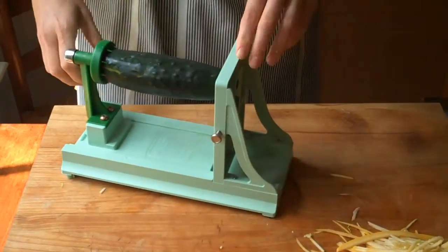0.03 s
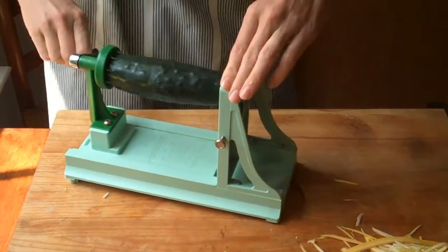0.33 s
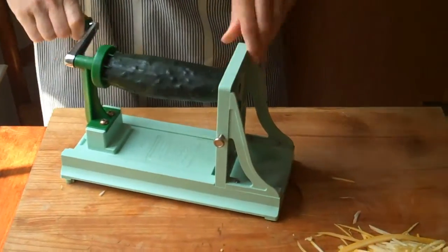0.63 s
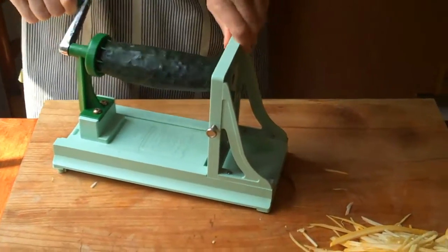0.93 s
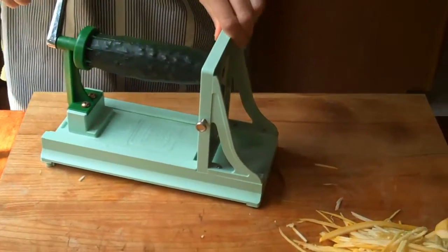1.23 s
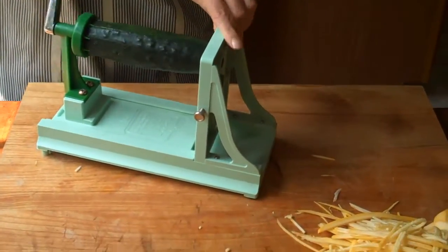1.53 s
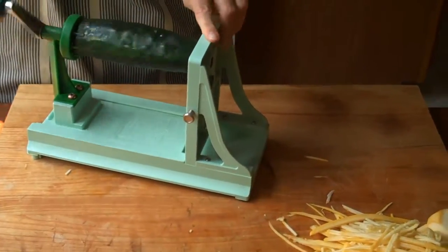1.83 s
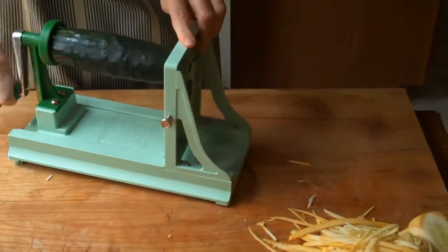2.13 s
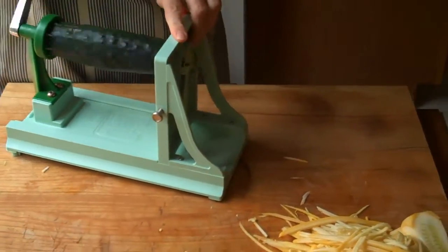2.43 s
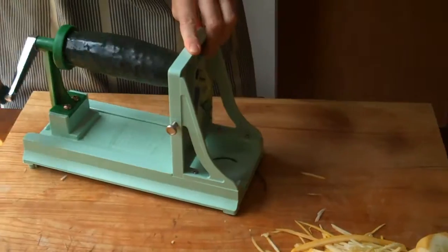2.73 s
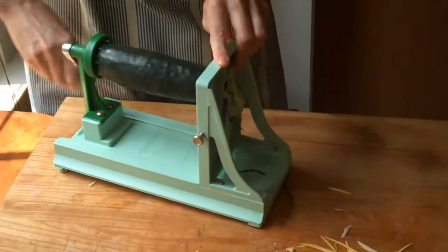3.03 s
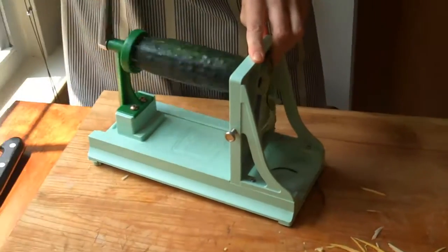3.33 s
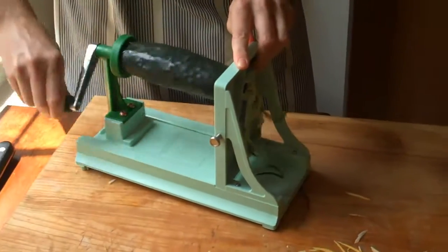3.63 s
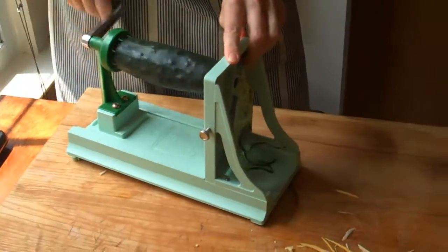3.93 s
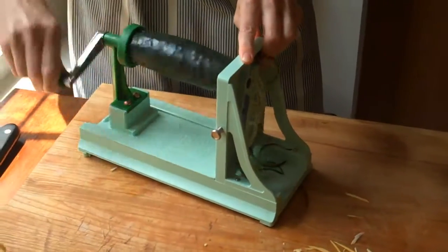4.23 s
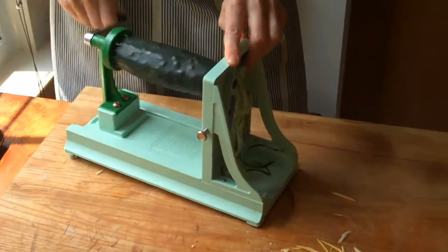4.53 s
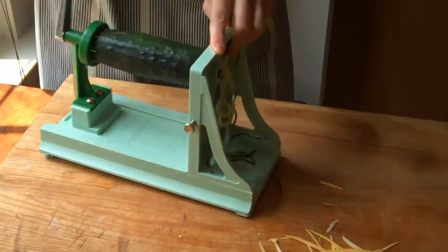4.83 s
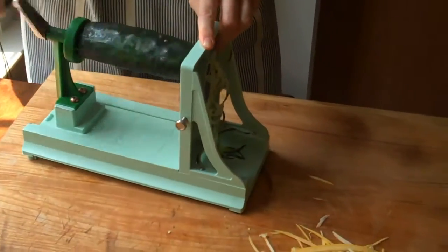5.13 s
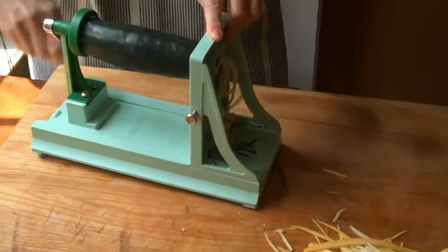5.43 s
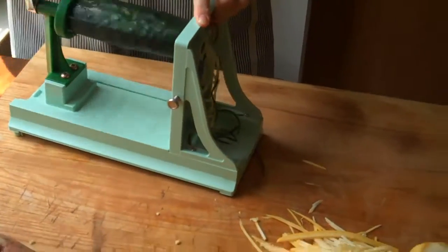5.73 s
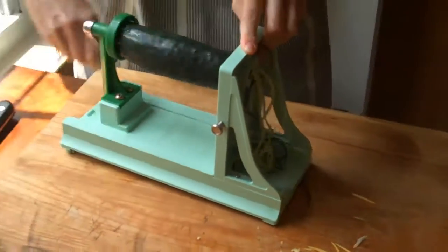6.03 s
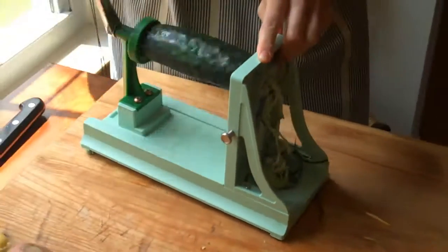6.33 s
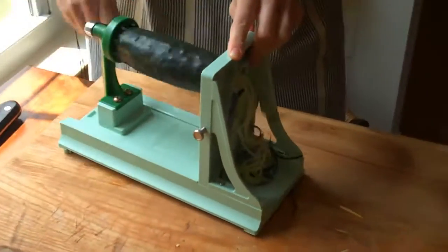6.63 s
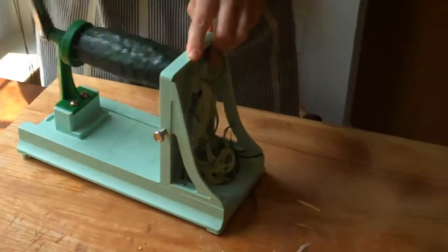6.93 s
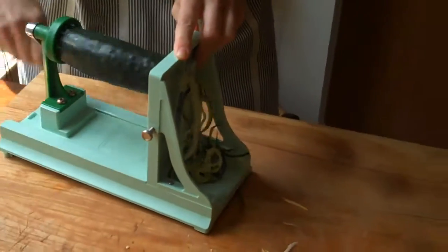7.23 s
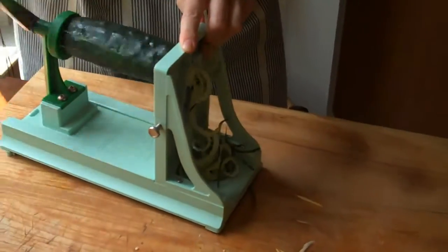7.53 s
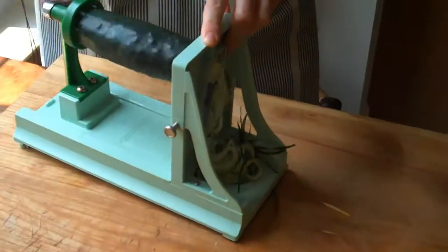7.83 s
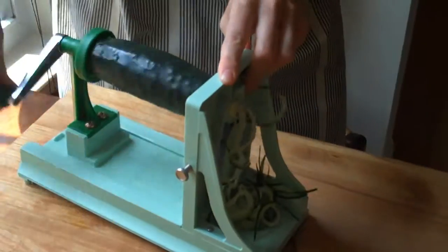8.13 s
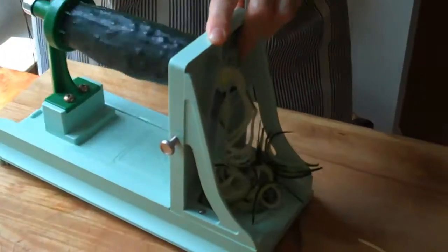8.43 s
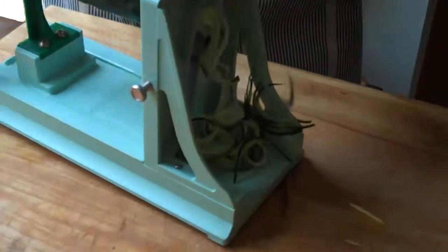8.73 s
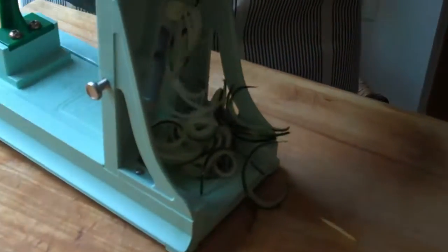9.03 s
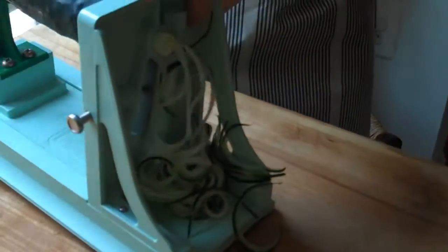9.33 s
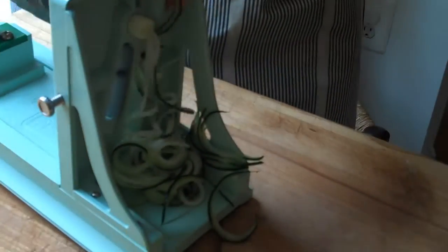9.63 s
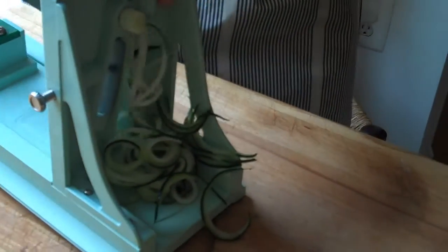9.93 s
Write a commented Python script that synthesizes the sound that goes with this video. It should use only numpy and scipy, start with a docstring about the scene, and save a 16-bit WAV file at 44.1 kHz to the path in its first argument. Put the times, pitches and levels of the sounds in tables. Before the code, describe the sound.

Close by in a small kitchen, a few plastic knocks and clicks come from a hand-cranked slicer starting up on a wooden board. After a short pause the cranking becomes continuous: sharp, irregular clacks and rattles over a quieter rasping scrape and the wet fizz of a cucumber being shredded. The cucumber creaks faintly twice, the base bumps the board now and then, and the rattling gets busier toward the end.

```python
"""A hand-cranked spiral slicer cuts a cucumber on a wooden board in a small kitchen.
The base thuds softly on the board and the crank makes two brief turns. From 1.6 s it keeps going:
the loose crank and carriage clack against the plastic frame while the blade scrapes and shreds the
wet flesh. The cucumber creaks at 2.4 and 3.3 s, the base thuds a few more times, and the clacks
crowd together through the second half. The room answers the knocks with a short tail."""
import sys
import numpy as np
from scipy import signal
from scipy.fft import rfft, irfft, next_fast_len
from scipy.io import wavfile
from scipy.ndimage import uniform_filter1d, map_coordinates

SR = 44100
rng = np.random.default_rng(int(sys.argv[2]) if len(sys.argv) > 2 else 0)


def store_pcm(level_fs):
    """Save levels as 16-bit WAV."""
    pcm = np.round(np.clip(level_fs, -1, 1) * 32767).astype(np.int16)
    wavfile.write(sys.argv[1], SR, np.atleast_2d(pcm).T)


N = 441000
TOP_HZ = 13950  # top edge of the sound
HARD_DB = -12.2  # clacks above this level graze before they land and shove the board

# Colour of the kitchen's air. Each row: frequency in Hz, level in dB.
AIR_COLOUR = [(12, -50), (20, -10), (65, -28), (85, -18.5), (170, -19), (229, -13.5), (249, -15),
              (356, -6.5), (386, -12.5), (903, -12), (1040, -13), (14000, -39)]
# The kitchen's reverb. Each row: frequency in Hz, time to fall 60 dB in seconds.
ROOM_DECAY = [(150, 0.29), (1000, .42), (2500, 0.33), (12000, 0.36)]
# When the crank turns. Each row: start in seconds, length in seconds.
CRANK_TURNS = [(0.302, .4), (0.825, 0.33), (1.558, 8.5)]
# Colour of the rubbing hiss. Each row: frequency in Hz, level in dB.
RUB_COLOUR = [(4000, -39), (5900, -3.5), (6600, -12), (7200, -2.5), (7800, -1), (8600, -8), (13000, -13.5)]
# How the blade bites. Each row: time in seconds, wet shredding in dB, drag relative to it in dB.
BITE = [(1.3, -69, -8), (1.74, -63, 3.5), (2.42, -49, -5), (2.53, -51, 9), (2.78, -59, 7.5),
        (3.03, -57.5, -9), (3.17, -50, 0.5), (3.6, -55, 2.5), (4.01, -48.5, 2.5), (4.66, -51.5, 2),
        (4.95, -68, 9), (5.21, -57, -4), (5.4, -49.5, -18), (5.62, -50.5, 5), (6.55, -49, -5),
        (6.95, -54, 8), (8.6, -52.5, 4), (8.94, -50, -10), (9.44, -50, 0.5), (10, -54.5, -0.5)]
# Colour of the dragging scrape. Each row: frequency in Hz, level in dB.
SCRAPE_COLOUR = [(80, -23), (200, -16), (400, -11.5), (680, 5), (1000, -11.5), (1500, -3), (2700, -1),
                 (4000, -18), (9000, -59)]
# Colour of the wet shredding. Each row: frequency in Hz, level in dB.
SHRED_COLOUR = [(800, -44), (2500, 3), (4200, 2), (5500, 4.5), (6800, -3), (9500, -3.5), (12800, -6),
                (14000, -5)]
# Where the blade plate sings. Each row: centre in Hz, width in Hz, lift in dB.
BLADE_RESONANCES = [(2710, 64, 9.5), (3570, 130, 5), (5000, 150, 4), (6630, 550, 7), (8750, 86, 0),
                    (9150, 650, 0), (12500, 360, 5)]
# The cucumber's creaks. Each row: start in seconds, length in seconds, level in dB, pitch in Hz.
CUCUMBER_CREAKS = [(2.432, 0.044, -40, 970), (3.251, 0.075, -47, 884)]
# The board's modes. Each row: frequency in Hz, level in dB, time to fall 60 dB in seconds.
BOARD_MODES = [(98, -25, 0.062), (141, -4, 0.15), (178, -18, 0.094), (226, -14, 0.08), (276, -6, 0.055),
               (337, 3.5, 0.11), (372, -7, 0.09), (540, -8, 0.06)]
# The base rocking on the board. Each row: start in seconds, level in dB, lift of the upper modes in dB.
BASE_THUDS = [(0.087, -35, -13), (0.19, -49.5, 13), (0.600, -50, 9), (3.259, -36, 1), (3.305, -40.5, 8),
              (4.663, -41.5, -4)]
# The plastic frame's overall colour. Each row: frequency in Hz, level in dB.
FRAME_COLOUR = [(40, -67.5), (200, -30), (290, -29), (450, -13.5), (650, -0.5), (1120, -3.5), (1450, -4.5),
                (2000, -6.5), (2900, -5), (4000, -11.5), (5800, -12), (9000, -20), (14000, -23.5)]
# The frame's strongest resonances. Each row: centre in Hz, width in Hz, lift in dB.
FRAME_RESONANCES = [(137.5, 13, 21), (211, 27, 7), (315, 13, 6.5), (433, 33, 9.5), (627, 56, 2.5),
                    (700, 11, 8), (735, 23, 5), (973, 15, 13), (1102, 45, 9), (1271, 92, 6), (1524, 23, 2),
                    (1896, 500, 5), (2256, 66, 4), (2750, 220, 2), (3165, 47, 4), (3480, 140, 4)]
# The frame's ring away from its resonances. Each row: frequency in Hz, time to fall 60 dB in seconds.
FRAME_DECAY = [(60, 0.13), (350, 0.21), (700, 0.094), (1100, 0.12), (2000, 0.035), (4500, 0.035),
               (12000, 0.016)]
# The louder clacks of crank and carriage. Each row: start in seconds, level in dB, then three tone
# controls in dB: hollow knock, ring of the upright, sharp snap.
CRANK_CLACKS = [(0.077, -34.5, -9, -13.5, -24), (0.278, -44, -21, -23, -25), (0.348, -35, -13, -18, -45),
                (0.467, -36.5, -6, -13, -21), (0.487, -34.5, -22, -21, -20), (0.518, -27.5, -24, -19, -19),
                (0.598, -29.5, -20, -12, -38), (0.662, -13, -25.5, -20, -32), (0.671, -19.5, -31, -5, -17),
                (0.687, -18.5, -22, -16, -19), (1.115, -42, 1, -9, -25), (1.371, -39, -5, -12, -16),
                (1.648, -20.5, -21, -17.5, -40), (1.737, -22.5, -22, -15, -18), (1.841, -40, -14, -12, -26),
                (1.921, -28.5, -10.5, -14, -26), (2.12, -25, -12.5, -14, -27), (2.211, -21.5, -7, -10, -25),
                (2.274, -23.5, -8.5, -6, -15), (2.506, -28.5, -21, -12, -24), (2.547, -21.5, -29, -15, -16),
                (2.585, -11, -20, -8.5, -11.5), (2.983, -22.5, -24, -19, -23),
                (3.054, -18, -25.5, -17, -26), (3.073, -22, -7, -7.5, -13), (3.313, -14, -23, -14, -7),
                (3.413, -12.5, -20, -19, -6.5), (3.456, -25, -12, -13, -14), (3.503, -26, -10, -16, -7),
                (3.529, -10.5, -16.5, -11, -14.5), (3.74, -23, -8.5, -12, -14),
                (3.85, -15.5, -17, -13.5, -27), (4.032, -18.5, -18.5, -15, -23),
                (4.143, -14, -22, -18, -10.5), (4.185, -11, -24, -12, -21.5),
                (4.313, -18.5, -13, -17, -6.5), (4.416, -20.5, -14.5, -11, -33),
                (4.474, -20.5, -23, -17, -31), (4.489, -19.5, -15, -9, -19), (4.601, -27, -32, -29, -2),
                (4.675, -21, -13.5, -11.5, -21), (4.824, -14.5, -18.5, -11.5, -17),
                (5.221, -12.5, -18.5, -12.5, -14), (5.335, -20, -23.5, -21.5, -36),
                (5.419, -13, -16.5, -18.5, -17.5), (5.47, -17, -19, -16, -24),
                (5.661, -18, -14.5, -13.5, -14.5), (5.761, -13, -25.5, -22, -12.5),
                (5.863, -13, -13, -7, -8.5), (6.055, -20, -5.5, -7.5, -26), (6.092, -13, -24, -10, -20.5),
                (6.166, -14, -27, -22, -25), (6.254, -20, -27, -20.5, -33), (6.293, -19.5, -23, -18, -29),
                (6.334, -20.5, -30, -21, -42), (6.361, -16, -25, -15, -12), (6.425, -10, -18, -11, -13.5),
                (6.531, -15.5, -27.5, -24, -25), (6.546, -12.5, -27, -23.5, -14),
                (6.568, -11.5, -26.5, -20, -22), (6.621, -10.5, -19.5, -17.5, -16),
                (6.652, -9.5, -30, -16.5, -21), (6.799, -13.5, -22, -17.5, -31),
                (6.913, -9.5, -18, -12, -12.5), (7.047, -30, -22.5, -13, -16.5), (7.104, -25, -4, -3, -10),
                (7.248, -20, -9, -9, -22), (7.268, -20, -19, -14, -23), (7.284, -13.5, -26, -13.5, -25),
                (7.505, -10, -29, -14.5, -12), (7.586, -22, -27.5, -24, -23), (7.661, -29.5, -3, -4, -17),
                (7.787, -10.5, -16, -13.5, -10.5), (7.827, -15, -27.5, -12.5, -25),
                (8.008, -18, -25, -16.5, -16), (8.047, -22, -22.5, -13.5, -26),
                (8.064, -17, -24, -27, -11.5), (8.139, -11.5, -22.5, -19.5, -18.5),
                (8.297, -12, -23, -13.5, -11.5), (8.335, -15.5, -19.5, -12.5, -26),
                (8.494, -16.5, -22.5, -13.5, -22), (8.591, -18, -21, -14.5, -9),
                (8.646, -14.5, -24, -13.5, -15), (8.761, -23.5, -19, -15, -22),
                (8.79, -16, -16.5, -19, -13.5), (8.853, -19.5, -11, -9.5, -14), (8.892, -11, -25, -14, -15),
                (9.045, -17, -14, -10, -27), (9.118, -28, -20, -22, -26), (9.139, -16, -18, -18.5, -7.5),
                (9.249, -14.5, -6.5, -12, -11), (9.354, -26.5, -12, -12, -25), (9.414, -18, -21, -14, -20),
                (9.462, -11.5, -22.5, -16.5, -20), (9.633, -20, -18.5, -17, -16.5),
                (9.737, -13, -21, -17, -16.5), (9.874, -26.5, -10, -14, -8)]


def amp(db):
    """Decibels to gain."""
    return 10 ** (np.asarray(db) / 20)


def unit(x):
    """Scale to rms 1."""
    return x / np.sqrt(np.mean(x ** 2) + 1e-20)


def along(points, hz):
    """Read (Hz, value) points on a log frequency axis."""
    freqs, values = np.transpose(points)
    return np.interp(np.log(hz + 1), np.log(freqs + 1), values)


def lift(resonances, hz):
    """The dB that a body's resonances add at each frequency."""
    return sum(db / (1 + (2 * (hz - centre) / width) ** 2) for centre, width, db in resonances)


def curves(rows):
    """An envelope for each column after the time."""
    times, *columns = np.transpose(rows)
    return [np.interp(np.arange(N) / SR, times, column) for column in columns]


def wobble(rate):
    """A random drift through rate points a second."""
    points = rng.standard_normal(int(N * rate / SR) + 4)
    return map_coordinates(points, [np.arange(N) * rate / SR], order=1)


def filtered(x, response):
    """Equalise x with a gain given as a function of frequency."""
    size = next_fast_len(N + SR // 2)
    return irfft(rfft(x, size) * response(np.fft.rfftfreq(size, 1 / SR)), size)[:N]


def coloured(x, colour, resonances=()):
    """Give x a colour and a body's resonances, at rms 1."""
    return unit(filtered(x, lambda hz: amp(along(colour, hz) + lift(resonances, hz))))


def grains(per_second, spread_db):
    """Random tiny impulses of uneven size, rms 1."""
    hit = rng.random(N) < per_second / SR
    return unit(hit * rng.standard_normal(N) * amp(spread_db * rng.standard_normal(N)))


def add(track, start, sound):
    """Mix a sound into the track at start seconds."""
    part = track[max(round(start * SR), 0):][:len(sound)]
    part += sound[:len(part)]


def turning(spin_up_s=0.05, spin_down_s=0.07):
    """A gate: 0 while the crank rests, 1 while it turns."""
    t = np.arange(N) / SR
    return sum(np.clip(np.minimum((t - start) / spin_up_s, 1 - (t - start - length) / spin_down_s), 0, 1)
               for start, length in CRANK_TURNS)


def kitchen_air(level_db):
    """A steady bed of room tone."""
    return amp(level_db) * coloured(rng.standard_normal(N), AIR_COLOUR)


def kitchen_reverb(x, swell_s, treble_db, count=40):
    """The walls' answer swells quickly; each stretch gets its own tail, as when hands move nearby."""
    hz, t, spectra = signal.stft(rng.standard_normal((count, SR // 2)), SR, nperseg=256)
    colour_db = along([(3000, 0.008), (8000, treble_db)], hz)[:, None]
    decay_db = 60 * t / along(ROOM_DECAY, hz)[:, None]
    tails = signal.istft(spectra * amp(colour_db - decay_db), SR, nperseg=256)[1]
    tails *= 1 - np.exp(-np.arange(tails.shape[1]) / SR / swell_s)
    out = np.zeros(N)
    for k, (part, tail) in enumerate(zip(np.array_split(x, count), tails)):
        add(out, k * N / count / SR, signal.fftconvolve(part, tail / np.linalg.norm(tail)))
    return out


def rubbing(level_db, flutter_db, full_cut_db=-51.5, follow=0.52):
    """A thin, fluttering rub while the crank turns, rising as the blade sinks into the flesh."""
    wet_db = curves(BITE)[0]
    rub_db = level_db + follow * (wet_db - full_cut_db) + flutter_db * wobble(110)
    return turning() * amp(rub_db) * coloured(rng.standard_normal(N), RUB_COLOUR)


def skin_crackle(level_db):
    """Firmer bits of skin snap on the blade."""
    wet_db = curves(BITE)[0]
    snaps = grains(per_second=40, spread_db=4.5)
    t = np.arange(SR // 100) / SR
    burst = rng.standard_normal(len(t)) * amp(-60 * t / 0.025)
    crackle = signal.fftconvolve(snaps, burst)[:N]
    return amp(wet_db + level_db) * coloured(crackle, SHRED_COLOUR, BLADE_RESONANCES)


def cutting(scrape_db, shred_db, ripple_db):
    """The cucumber judders over the blade and shakes the frame; its bursting cells fizz."""
    wet_db, drag_db = curves(BITE)
    slips = grains(per_second=2000, spread_db=1.5) * amp(2.15 * wobble(30))
    scrape = coloured(slips, SCRAPE_COLOUR, FRAME_RESONANCES)
    cells = grains(per_second=12000, spread_db=2.0) * amp(2.2 * wobble(40) + 1.62 * wobble(6.9))
    # many weak, narrow modes of the blade plate ripple the fizz
    fine_hz = np.linspace(0, TOP_HZ, 300)
    fine_db = ripple_db * rng.standard_normal(len(fine_hz))

    def plate(hz):
        return amp(along(SHRED_COLOUR, hz) + lift(BLADE_RESONANCES, hz) + np.interp(hz, fine_hz, fine_db))

    shred = unit(filtered(cells, plate))
    return amp(wet_db) * (amp(drag_db + scrape_db) * scrape + amp(shred_db) * shred)


def creaks(slips_per_s):
    """The cucumber drags: a short run of uneven slips rings a narrow resonance and its octave."""
    out = np.zeros(N)
    for start, length, db, hz in CUCUMBER_CREAKS:
        t = np.arange(round(length * SR)) / SR
        travel = np.cumsum(rng.exponential(slips_per_s / SR, len(t)))
        slips = np.diff(np.floor(travel), prepend=0)
        ring = (np.sin(2 * np.pi * hz * t) + 0.17 * np.sin(4 * np.pi * hz * t)) * amp(-60 * t / 0.043)
        creak = signal.fftconvolve(slips * rng.standard_normal(len(t)), ring)[:len(t)]
        add(out, start, amp(db) * unit(creak) * np.sin(np.pi * t / length))
    return out


def thuds(level_db, upper_db, shudder_s, band_hz):
    """The base settles on the board in a short shudder that rings the board's low modes."""
    t, out = np.arange(SR // 3) / SR, np.zeros(N)
    band = signal.butter(2, band_hz, "bandpass", fs=SR)
    for start, db, knock in BASE_THUDS:
        ring = sum(amp(level + (knock + upper_db) * (hz > 280) - 60 * t / t60) * np.cos(2 * np.pi * hz * t)
                   for hz, level, t60 in BOARD_MODES)
        # soft feet: the contact swells before it dies away
        force = rng.standard_normal(len(t)) * t / shudder_s * np.exp(-t / shudder_s)
        thud = signal.lfilter(*band, signal.fftconvolve(force, ring))
        add(out, start, amp(db + level_db) * thud / np.abs(thud).max())
    return out


def shoves(level_db, rise_s):
    """The hardest clacks give the board one short, low push; the sharper the blow, the stronger."""
    age, out = np.arange(SR // 20) / SR / rise_s, np.zeros(N)
    for start, db, _, _, snap in CRANK_CLACKS:
        if db > HARD_DB:
            add(out, start, amp(level_db + db + snap) * age * np.exp(-age))
    return out


def ticks(count, over_shred_db=18.5, knock_db=-17.5, ring_db=-15, snap_db=-31, scatter_db=1.5):
    """Light clack rows: play in the crank ticks at random, more often and harder as the blade bites."""
    wet_db = curves(BITE)[0]
    work = np.cumsum(turning() * amp(wet_db / 2))
    at = np.searchsorted(work, work[-1] * (np.arange(count) + rng.random(count)) / count)
    levels = [over_shred_db, knock_db, ring_db, snap_db] + scatter_db * rng.standard_normal((count, 4))
    levels[:, 0] += wet_db[at]
    return np.column_stack([at / SR, levels])


def grazes(lead_s=0.004, level_db=-16, snap_db=-4):
    """Clack rows for the weaker, duller touch just before each hard clack lands."""
    return [(start - lead_s, db + level_db, knock, ring, snap + snap_db)
            for start, db, knock, ring, snap in CRANK_CLACKS if db > HARD_DB]


def contact_click(level_db, hz):
    """The instant of contact: a click of about one cycle."""
    t = np.arange(SR // 200) / SR
    return amp(level_db) * np.sin(2 * np.pi * hz * t) * np.exp(-t * hz * 2)


def clacks(level_db, knock_db, ring_db, snap_db, attack_s, lag_s, sustain, vary_db, count=640):
    """Crank and carriage strike the frame and ring its crowd of modes; hard contacts reach higher."""
    t = np.arange(SR // 5) / SR
    hz = (np.arange(count) + 2 + rng.uniform(-.25, .25, count)) * TOP_HZ / count
    resonance_db = lift(FRAME_RESONANCES, hz)
    # the strong low resonances are the least damped
    t60 = along(FRAME_DECAY, hz) * amp(sustain * resonance_db / (1 + (hz / 2200) ** 4))
    modes = np.exp((2j * np.pi * hz - np.log(1000) / t60)[:, None] * t)
    colour = amp(along(FRAME_COLOUR, hz) + resonance_db) / np.sqrt(t60)
    # the hollow base knocks, the upright rings about an octave above it, hardness tilts the treble
    base = np.exp(-(np.log2(hz / 590) / 0.51) ** 2)
    upright = np.exp(-(np.log2(hz / 1120) / 0.53) ** 2)
    treble = np.log(1 + (hz / 3200) ** 2) / 2.5
    starts, db, knock, ring, snap = np.vstack([CRANK_CLACKS, ticks(count=18), grazes()]).T
    tone_db = np.outer(knock + knock_db, base) + np.outer(ring + ring_db, upright)
    tone_db += np.outer(snap + snap_db, treble)
    # the point of contact favours some groups of modes and sets each phase anew
    chance = rng.random((len(starts), 2, count))
    favour = unit(uniform_filter1d(chance[:, 0] - .5, size=9, axis=1))
    strikes = colour * amp(tone_db + vary_db * favour) * np.exp(2j * np.pi * chance[:, 1])
    strikes /= np.linalg.norm(strikes, axis=1, keepdims=True)
    bodies = (strikes @ modes).real * (1 - np.exp(-t / attack_s))
    click = contact_click(level_db=-5, hz=5050)
    out = np.zeros(N)
    for start, gain, body, hardness in zip(starts + lag_s, amp(db + level_db), bodies, amp(snap + snap_db)):
        add(out, start, gain * body)
        add(out, start, gain * hardness * click)
    return out


def scene():
    """The mono mix: clacks, thuds and creaks feed the reverb, the rest stays dry."""
    hits = clacks(level_db=-2.1, knock_db=16.0, ring_db=12.5, snap_db=14.0,
                  attack_s=0.00075, lag_s=0.0008, sustain=0.57, vary_db=2)
    hits += thuds(level_db=2, upper_db=5.0, shudder_s=0.0098, band_hz=[95, 706])
    hits += creaks(slips_per_s=400)
    low_end = shoves(level_db=-24.0, rise_s=0.0016)
    room = amp(-8.0) * kitchen_reverb(hits, swell_s=0.0026, treble_db=0)
    blade = cutting(scrape_db=-1.5, shred_db=1.17, ripple_db=3.0) + skin_crackle(level_db=-8.5)
    bed = rubbing(level_db=-56.5, flutter_db=2) + kitchen_air(level_db=-58.5)
    return (hits + low_end + room + turning() * blade + bed)[None]


def record(dry):
    """A steep low-pass shaves off the highest treble."""
    return filtered(dry[0], lambda hz: 1 / (1 + (hz / TOP_HZ) ** 160))[None]


dry = scene()
out = record(dry)
store_pcm(out)
```